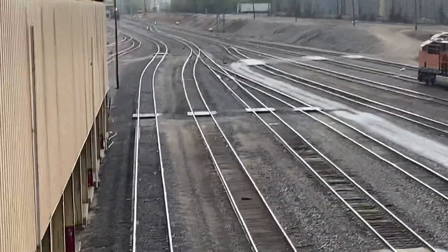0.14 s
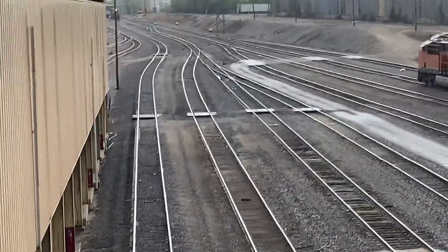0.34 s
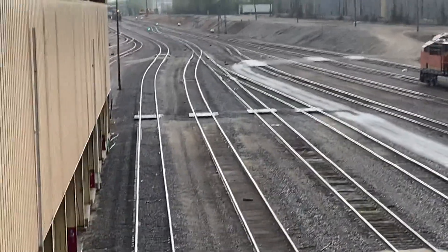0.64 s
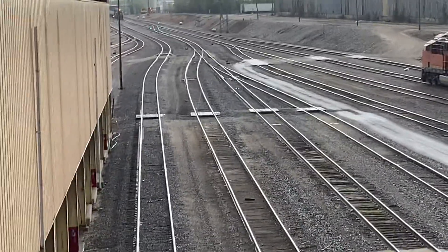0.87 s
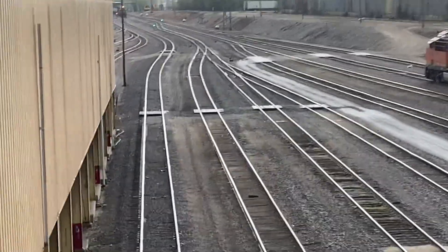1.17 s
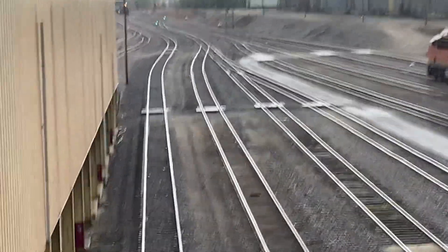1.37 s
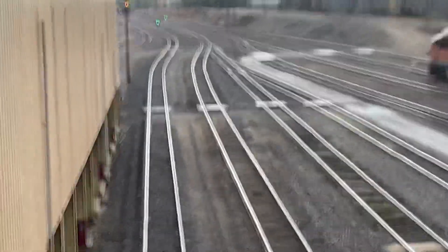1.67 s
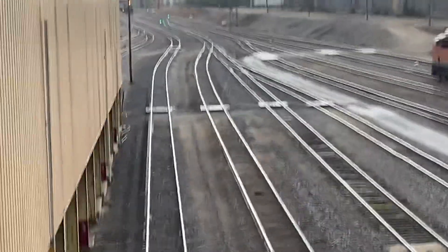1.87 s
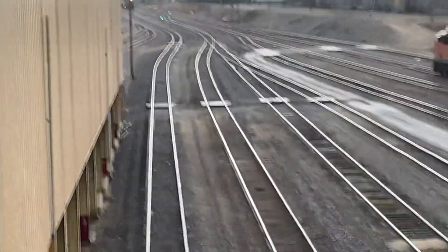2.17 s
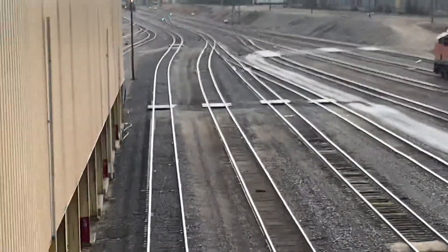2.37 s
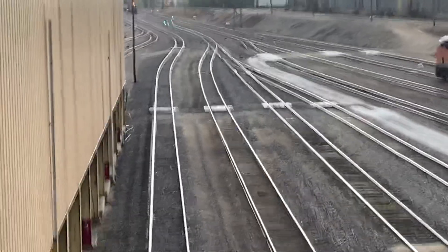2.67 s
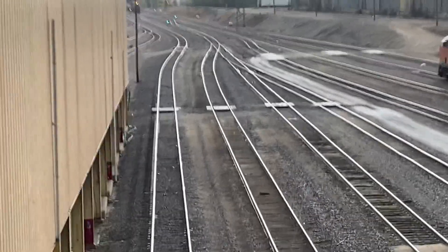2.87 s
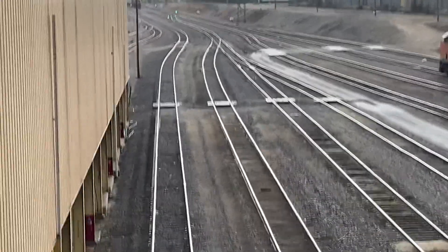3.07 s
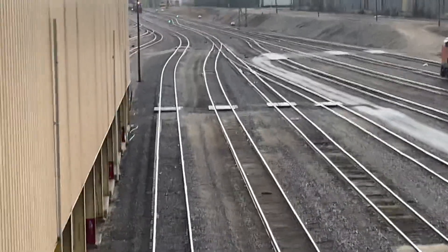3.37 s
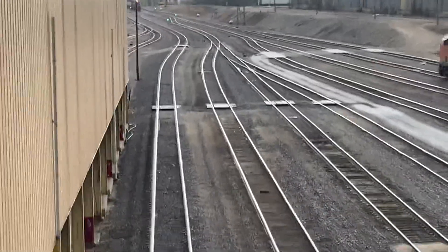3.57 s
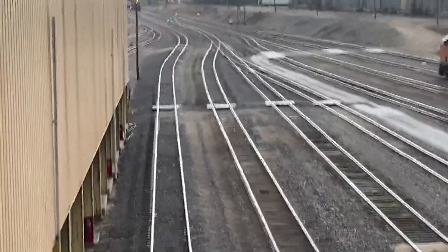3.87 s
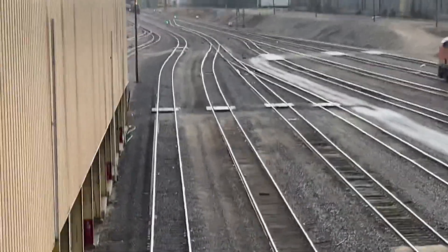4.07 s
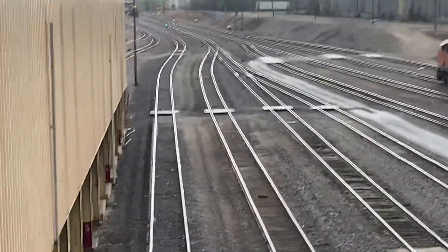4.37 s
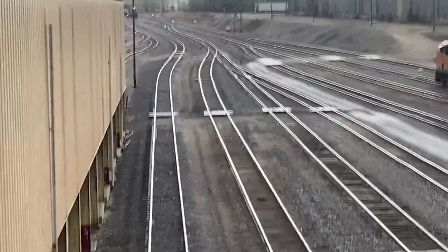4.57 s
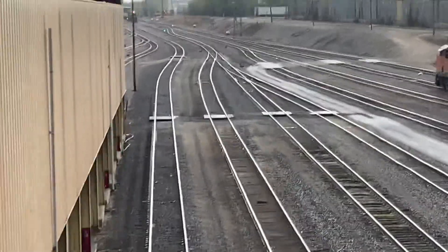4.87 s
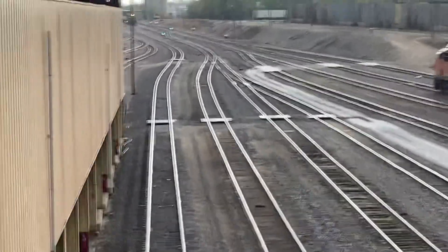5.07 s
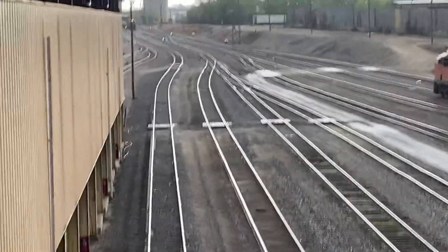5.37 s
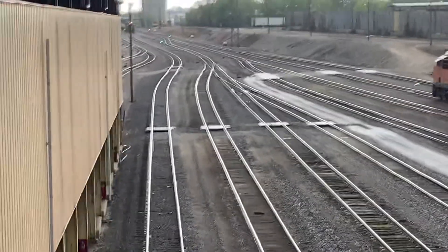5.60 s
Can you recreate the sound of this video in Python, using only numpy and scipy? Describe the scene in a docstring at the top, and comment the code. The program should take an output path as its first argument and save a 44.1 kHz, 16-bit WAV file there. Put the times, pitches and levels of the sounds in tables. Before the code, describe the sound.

Steady low throbbing engine drone of idling diesel locomotives outdoors, with a wavering high whine and soft compressed-air hiss swelling now and then.

```python
"""Idling diesel locomotives

Several engines idle across a rail yard, heard from beside a shed wall in stereo.
Steady exhaust tones beat slowly inside a wide noise roar, and the deepest band comes in uneven lumps.
Two turbocharger whines, each a cluster of blurred blade tones, rise and dip at random.
Compressed air, as shaped noise, hisses and swells now and then."""
import sys
import numpy as np
from scipy import signal
from scipy.fft import rfft, irfft
from scipy.io import wavfile
from scipy.ndimage import uniform_filter1d

SR = 44100
rng = np.random.default_rng(int(sys.argv[2]) if len(sys.argv) > 2 else 0)


def wav_out(sig):
    """Save sig, one row per channel (or a flat mono array), as 16-bit PCM at SR to the path in sys.argv[1]."""
    wavfile.write(sys.argv[1], SR, np.round(np.clip(np.atleast_2d(sig).T, -1, 1) * 32767).astype(np.int16))


N = 253116

# exhaust and engine-block tones: pitch_hz
TONE_PITCHES = [49.5, 54.9, 60.1, 62.5, 65.0, 73.0, 77.0, 79.7, 128.3, 131.1, 138.2, 146.0, 160.2, 179.9,
                189.9, 214.0, 234.1, 254.0, 277.0, 320.2, 351.1, 368.0, 412.0, 464.8, 507.0, 527.1, 680.7]
# their levels, same order: level_db
TONE_LEVELS = [-36, -28, -29, -36.5, -32.5, -38, -33.5, -38.5, -33.5, -34.5, -35.5, -42.5, -35.5, -32.5,
               -40, -46, -44.5, -43, -40.5, -42, -42.5, -53.5, -45.5, -40, -44, -45, -45.5]
# spectrum of exhausts, fans and yard echoes: frequency_hz, relative_density_db
ROAR_SPECTRUM = [(20, -20), (45, -4.5), (62, -3.5), (110, -7.5), (250, -13), (400, -16), (560, -20.5),
                 (900, -21.5), (1400, -25.5), (2200, -32), (3500, -37.5), (6000, -44), (9000, -53.5),
                 (14500, -68)]
# drift of the roar's bands: time_s, rumble_db, growl_db, mid_db
ROAR_SWELL = [(0.0, -5.5, -1.5, 1), (0.6, 0, 0.5, -0.5), (1.45, 1, 0, -1), (2.4, 3, -1, -0.5),
              (2.75, -6, 0.5, 1), (3.7, 1, 0.5, -1.5), (4.15, -1.5, 0.5, 0.5), (5.0, 4, 2, -0.5),
              (5.74, 1, 1, 1)]
# hood and duct resonances in the roar, one of them a dip: centre_hz, width_hz, boost_db
HOOD_RESONANCES = [(616, 19, 3.5), (689, 26, 4.5), (745, 25, 4.5), (795, 66, -3)]
# loudness of the deepest band over time, uneven lumps from chance beating: time_s, level_db
DEEP_LEVEL = [(0.0, -21.5), (0.09, -21), (0.2, -21.5), (0.31, -28), (0.48, -18), (0.54, -24), (0.69, -17.5),
              (0.78, -25), (0.86, -21), (0.93, -26.5), (1.02, -16.0), (1.18, -25.5), (1.33, -15.5),
              (1.38, -24), (1.47, -16.5), (1.57, -23), (1.64, -19), (1.75, -25), (2.14, -20.5), (2.27, -20),
              (2.32, -20.5), (2.69, -26), (2.74, -18), (2.8, -24), (2.93, -16.5), (3.07, -21), (3.13, -18),
              (3.34, -28), (3.47, -17.5), (3.62, -34), (3.74, -19.5), (3.86, -28), (4.13, -17.5),
              (4.21, -26), (4.28, -19), (4.33, -27), (4.38, -19), (4.44, -31), (4.56, -16.5), (4.62, -23.5),
              (4.76, -19.5), (4.89, -27), (4.94, -22.5), (5.01, -22.5), (5.12, -17.5), (5.22, -24.5),
              (5.39, -18), (5.44, -21), (5.49, -21), (5.53, -26), (5.6, -15), (5.74, -29.5)]
# whine loudness over time, rising and dipping at random: time_s, level_db
HIGH_WHINE_LEVEL = [(0.0, -51), (0.06, -34), (0.17, -67), (0.2, -36.5), (0.25, -49.5), (0.34, -36.5),
                    (0.49, -45.5), (0.62, -39.5), (0.66, -38), (0.81, -36), (0.93, -47), (0.97, -37.5),
                    (1.07, -50), (1.16, -41), (1.26, -49), (1.42, -34.5), (1.46, -45), (1.53, -37),
                    (1.59, -43), (1.63, -33), (1.72, -60), (1.8, -38), (1.84, -56), (1.88, -32),
                    (1.94, -53), (2.11, -36), (2.15, -48), (2.2, -38), (2.23, -46), (2.32, -35.5),
                    (2.35, -43.0), (2.4, -33.5), (2.46, -45), (2.5, -35), (2.56, -47.5), (2.63, -36),
                    (2.67, -46), (2.74, -38.5), (2.81, -51), (2.87, -38), (2.95, -59), (2.98, -35),
                    (3.01, -53), (3.05, -33.5), (3.1, -44), (3.12, -35), (3.14, -43), (3.18, -34),
                    (3.24, -53), (3.28, -40.5), (3.41, -56), (3.45, -37), (3.53, -46), (3.6, -37),
                    (3.65, -50), (3.69, -33), (3.71, -48), (3.76, -30), (3.79, -47), (3.82, -36),
                    (3.85, -52), (3.89, -38), (3.92, -58), (3.95, -38), (4.03, -60), (4.08, -38.5),
                    (4.2, -52), (4.3, -32.5), (4.33, -41), (4.39, -35), (4.43, -48), (4.47, -31),
                    (4.52, -44), (4.55, -37), (4.59, -43), (4.63, -38.5), (4.87, -35), (4.9, -44),
                    (4.95, -37), (5.11, -43), (5.14, -39), (5.18, -49), (5.22, -35), (5.25, -51),
                    (5.28, -29.5), (5.35, -44), (5.39, -31), (5.47, -45), (5.58, -32), (5.67, -52),
                    (5.74, -39)]
LOW_WHINE_LEVEL = [(0.0, -47), (0.13, -43.5), (0.22, -47), (0.51, -41.5), (0.61, -57), (0.66, -34.5),
                   (0.71, -44), (0.75, -35.5), (0.83, -57), (1.01, -44), (1.06, -50.0), (1.1, -34.5),
                   (1.23, -52), (1.4, -40), (1.49, -55), (1.58, -41), (1.71, -48), (1.8, -42.0),
                   (1.88, -54), (2.16, -40), (2.26, -45), (2.41, -43), (2.53, -54), (2.64, -37),
                   (2.85, -48), (2.9, -38), (3.07, -54), (3.22, -40), (3.43, -47), (3.48, -40.5),
                   (3.76, -50), (3.95, -42.5), (3.99, -51), (4.06, -43), (4.14, -50), (4.36, -39),
                   (4.39, -48), (4.43, -37.5), (4.63, -50), (4.81, -43), (4.87, -46), (4.91, -33),
                   (4.99, -52), (5.07, -36.5), (5.18, -58), (5.25, -41), (5.51, -48), (5.67, -40),
                   (5.74, -50)]
# turbochargers of neighbouring engines: pitch_hz, blur_hz, share_db
HIGH_BLADE_TONES = [(3010, 55, -12), (3004, 6, -2.5), (3018, 6, 0), (3027, 6, -7)]
LOW_BLADE_TONES = [(1450, 16, -11), (1461, 4, -5), (1472, 5, -1), (1486, 6, 0)]
# compressed air: time_s, level_db, crest_hz, fizz_db
AIR_JET = [(0.0, -43.5, 4970, -56), (0.33, -42, 4740, -58), (0.6, -52, 4320, -62), (1.9, -52, 4270, -65),
           (2.01, -37.5, 3780, -51.5), (2.21, -42.5, 4000, -57.5), (2.48, -44, 4400, -54.5),
           (3.45, -44, 4200, -60), (3.56, -42, 4450, -58), (3.66, -46.5, 4350, -68), (3.82, -40, 4500, -60),
           (3.95, -39, 4900, -60), (4.06, -41, 4700, -62), (4.2, -46.5, 4360, -67), (4.54, -38, 4100, -66),
           (5.1, -43, 4280, -58.5), (5.45, -38.5, 4250, -64), (5.74, -38, 4280, -52)]
# how alike the two channels are, by frequency: frequency_hz, likeness_0_to_1
CHANNEL_LIKENESS = [(60, .97), (250, .76), (430, .62), (620, .35), (1000, .5), (1300, .73), (1800, .36),
                    (3000, .12), (4800, .4), (5700, .25), (7100, .55), (7700, .45), (8500, .95), (9900, .6),
                    (10600, .95)]
# phase of the right channel against the left, by frequency: frequency_hz, phase_rad (subtracted)
CHANNEL_PHASE = [(0, 0), (500, 1.2), (760, 3.1), (1720, 3.3), (2400, 6.4), (6900, 18.85), (7300, 18.8),
                 (8600, 15.8), (9700, 15.7), (10500, 12.7), (12100, 12.6), (12700, 9.5), (16000, 9.4)]
# left minus right: frequency_hz, lean_db
CHANNEL_LEAN = [(60, -0.5), (130, -1.5), (290, 3), (640, 3), (1410, -1), (3100, 0), (6820, -2.5),
                (15000, 3.5)]

ROAR_LEVEL_DB = -18
CHUG_HZ, CHUG_WIDTH_HZ, CHUG_DB_PER_S = 654, 130, .7  # upper exhaust body fills out over time
# deepest band; DEEP_HOLD is the share of fading slower than LUMP_S that follows DEEP_LEVEL
DEEP_LOW_HZ, DEEP_HIGH_HZ, LUMP_S, DEEP_HOLD = 42, 92, .045, .95
FADE_S, WHINE_HOLD = .025, .62  # share of whine fading slower than FADE_S that is held back
BAND_EDGE_HZ = 15800
FRAME, HOP, FLUTTER_STEP = 2048, 512, 128  # samples


def gain_of(db):
    """dB to amplitude."""
    return 10 ** (np.asarray(db) / 20)


def evened(x):
    """Scales to rms 1."""
    return x / np.sqrt(np.mean(abs(x) ** 2) + 1e-20)


def read(points, hz):
    """Spectrum table interpolated on a log-frequency axis."""
    f, value = np.transpose(points)
    return np.interp(np.log(hz + 1), np.log(f + 1), value)


def columns(rows, t):
    """Columns of a time curve, interpolated at times t."""
    time_s, *rest = np.transpose(rows)
    return [np.interp(t, time_s, column) for column in rest]


def pair(near, stray, hz, like):
    """Stereo pair: the right shares the left's wave, turned in phase by frequency, plus stray waves."""
    phase_rad = np.interp(hz, *np.transpose(CHANNEL_PHASE))
    lean = gain_of(read(CHANNEL_LEAN, hz) / 2)
    like = np.clip(like, 0, .97)
    left = lean * near
    right = (like * np.exp(-1j * phase_rad) * near + np.sqrt(1 - like ** 2) * stray) / lean
    return np.array([left, right])


def flutter(rate_hz):
    """Complex random gain of rms 1, changing about rate_hz times a second as paths add and cancel."""
    steps = N // FLUTTER_STEP + 2
    spectrum = np.fft.fft(rng.standard_normal(steps) + 1j * rng.standard_normal(steps))
    lowpass = np.exp(-(np.fft.fftfreq(steps, FLUTTER_STEP / SR) / rate_hz) ** 2)
    slow = evened(np.fft.ifft(spectrum * lowpass))
    at = np.arange(N) / FLUTTER_STEP
    return np.interp(at, np.arange(steps), slow.real) + 1j * np.interp(at, np.arange(steps), slow.imag)


def drift(field, bins, frames):
    """Random field smoothed over frequency bins and time frames, rms 1."""
    return evened(uniform_filter1d(uniform_filter1d(field, size=bins, axis=0), size=frames, axis=1))


def noise(shape, patchy_db, gusty_db):
    """Stereo noise from random short-time spectra; shape(hz, t) sets magnitude, patches and gusts vary it."""
    frames, hz = N // HOP + 5, np.fft.rfftfreq(FRAME, 1 / SR)[:, None]
    a, b, c, d, patches, gusts = rng.standard_normal((frames, FRAME // 2 + 1, 6)).T
    patches = drift(patches, bins=16, frames=9)
    gusts = drift(gusts, bins=70, frames=5)  # wide and brief
    stirred = 1 / (1 + (500 / (hz + 1)) ** 2)  # moving air hardly disturbs long waves
    spectra = pair(a + 1j * b, c + 1j * d, hz, read(CHANNEL_LIKENESS, hz))
    spectra *= shape(hz, np.arange(frames) * HOP / SR)
    spectra *= gain_of((patchy_db * patches + gusty_db * gusts) * stirred)
    return signal.istft(spectra, nperseg=FRAME, noverlap=FRAME - HOP)[1][:, :N]


def exhausts():
    """Steady firing and shaft tones, each fading by itself; close ones beat into a throb."""
    t, out = np.arange(N) / SR, np.zeros((2, N))
    for hz, level_db in zip(TONE_PITCHES, TONE_LEVELS):
        near = np.exp(2j * np.pi * (hz * t + rng.random())) * (2.1 + flutter(1.1))
        stray = np.exp(2j * np.pi * hz * t) * flutter(0.16)
        out += gain_of(level_db) * evened(pair(near, stray, hz, 1.0).real)
    return out


def roar():
    """Wide resonant noise whose rumble, growl and middle swell apart."""
    def shape(hz, t):
        rumble_db, growl_db, mid_db = columns(ROAR_SWELL, t)
        # share of each frequency that follows each swell
        rumble = 1 / (1 + (hz / 125) ** 4)
        growl = (1 - rumble) / (1 + (hz / 340) ** 4)
        mid = (1 - rumble - growl) / (1 + (hz / 1600) ** 2)
        swell_db = rumble * rumble_db + growl * growl_db + mid * mid_db
        hoods_db = sum(db * np.exp(-((hz - f) / width) ** 2) for f, width, db in HOOD_RESONANCES)
        chug_db = CHUG_DB_PER_S * (t - t.mean()) * np.exp(-((hz - CHUG_HZ) / CHUG_WIDTH_HZ) ** 2)
        return gain_of(read(ROAR_SPECTRUM, hz) + hoods_db + chug_db + swell_db)
    return gain_of(ROAR_LEVEL_DB) * evened(noise(shape, patchy_db=1.0, gusty_db=1.5))


def with_deep_lumps(engines):
    """Sets the loudness of the deepest band over time: uneven lumps, as from chance beating."""
    hz = np.fft.rfftfreq(N, 1 / SR)
    band = 1 / (1 + (DEEP_LOW_HZ / (hz + 1)) ** 8) / (1 + (hz / DEEP_HIGH_HZ) ** 8)
    deep = irfft(rfft(engines) * band, N)
    level = np.sqrt(abs(uniform_filter1d(deep.mean(0) ** 2, size=round(LUMP_S * SR))) + 1e-6)
    level = uniform_filter1d(level, size=round(LUMP_S * SR / 2))
    loudness = gain_of(columns(DEEP_LEVEL, np.arange(N) / SR)[0])
    return engines + deep * ((loudness / level) ** DEEP_HOLD - 1)


def blade_cluster(blades, multiple):
    """Close blade tones, blurred by turbulence, that beat into beads."""
    t = np.arange(N) / SR
    return sum(gain_of(share_db) * np.exp(2j * np.pi * multiple * hz * t) * flutter(multiple * blur_hz)
               for hz, blur_hz, share_db in blades)


def whine(level_rows, blades, echo_db, octave_db, lean_db):
    """Turbocharger blade tones and their octave; an echo reaches the two channels in opposite phase."""
    level = gain_of(columns(level_rows, np.arange(N) / SR)[0])
    out = 0
    for multiple, part_db in ((1, 0), (2, octave_db)):
        direct = blade_cluster(blades, multiple)
        echo = blade_cluster(blades, multiple)
        direct = direct / uniform_filter1d(abs(direct), size=round(FADE_S * SR)) ** WHINE_HOLD
        direct = level * evened(direct.real)
        echo = gain_of(echo_db) * evened(echo.real)
        out = out + gain_of(part_db) * np.array([direct + echo, direct - echo])
    return gain_of([[lean_db / 2], [-lean_db / 2]]) * out


def air():
    """Jet hiss: broad hump and narrower crest that slide together, a treble slope, thin fizz on top."""
    def jet(hz, t):
        crest_hz = columns(AIR_JET, t)[1]
        hump = np.exp(-((hz - crest_hz) / 1300) ** 2)
        crest = .9 * np.exp(-((hz - crest_hz) / 300) ** 2)
        slope = gain_of(8 - 5.0 * np.log2(hz / 4000 + 1e-3))
        slope = slope / (1 + (2800 / (hz + 1)) ** 6) / (1 + (hz / 8500) ** 8)
        return hump + crest + slope

    def fizz(hz, t):
        return np.exp(-((hz - 10900) / 1500) ** 6) + 0 * t  # 0 * t spreads it over all frames

    level_db, _, fizz_db = columns(AIR_JET, np.arange(N) / SR)
    out = gain_of(level_db) * evened(noise(jet, patchy_db=1.1, gusty_db=.8))
    return out + gain_of(fizz_db) * evened(noise(fizz, patchy_db=2.2, gusty_db=1.3))


def scene():
    """Engines, turbochargers and air together."""
    turbos = whine(HIGH_WHINE_LEVEL, HIGH_BLADE_TONES, echo_db=-43.5, octave_db=-26, lean_db=3.5)
    turbos += whine(LOW_WHINE_LEVEL, LOW_BLADE_TONES, echo_db=-37.0, octave_db=-11.5, lean_db=2.0)
    return with_deep_lumps(exhausts() + roar()) + air() + turbos


def record(dry):
    """Microphone bass cut, a light gain control that evens the throb, and the band limit."""
    cut = signal.sosfilt(signal.butter(5, 41, "high", fs=SR, output="sos"), dry)
    power_db = 10 * np.log10(abs(uniform_filter1d((cut ** 2).mean(0), size=2500)) + 1e-12)
    power_db = uniform_filter1d(power_db, size=1200)
    # loud moments lowered and quiet ones raised, 0.099 dB per dB from -15.5
    levelled = cut / gain_of(0.099 * (power_db + 15.5))
    lowpass = signal.firwin(511, BAND_EDGE_HZ, window=("kaiser", 9), fs=SR)
    return signal.oaconvolve(levelled, lowpass[None], "same")


dry = scene()
out = record(dry)
wav_out(out)
```